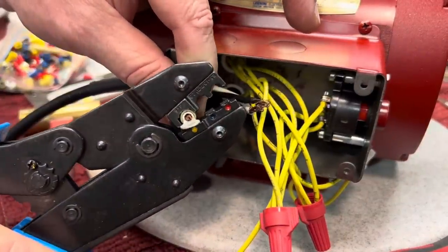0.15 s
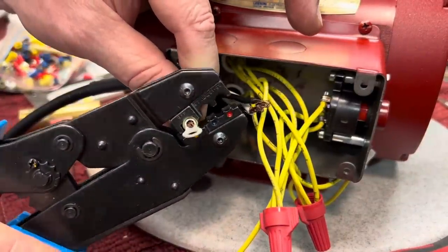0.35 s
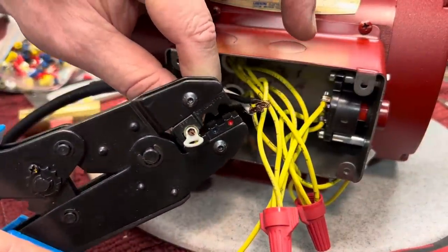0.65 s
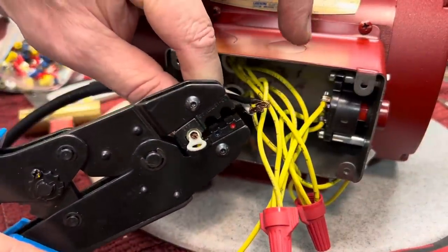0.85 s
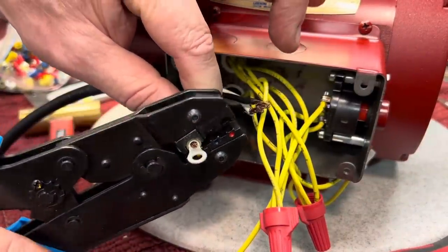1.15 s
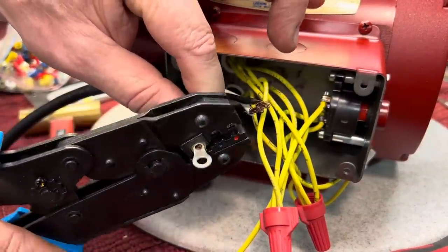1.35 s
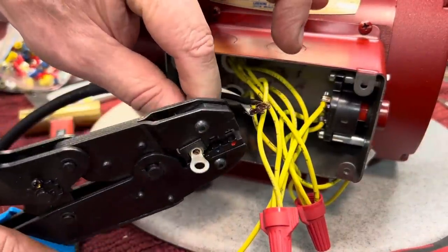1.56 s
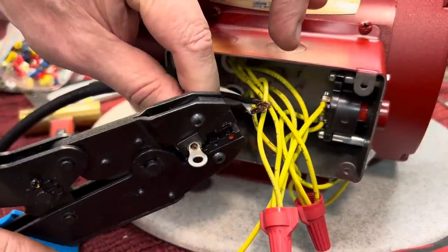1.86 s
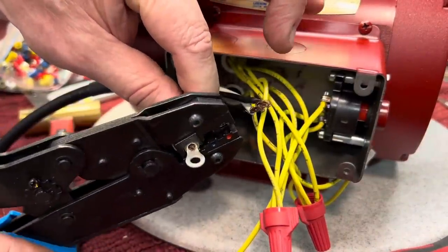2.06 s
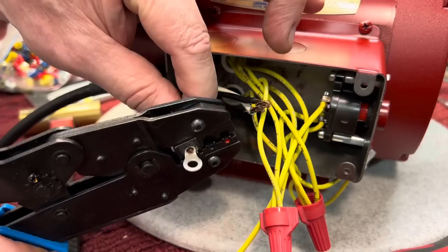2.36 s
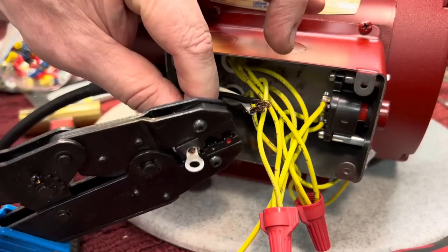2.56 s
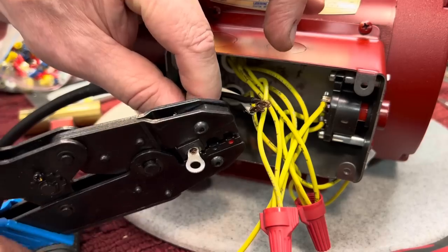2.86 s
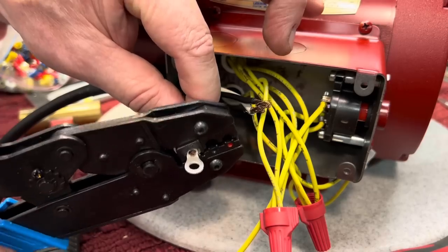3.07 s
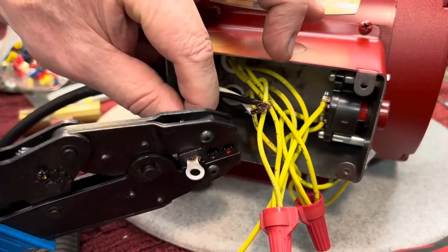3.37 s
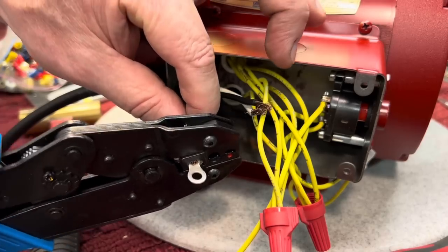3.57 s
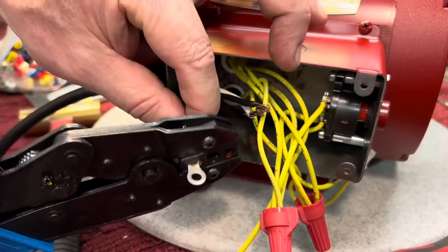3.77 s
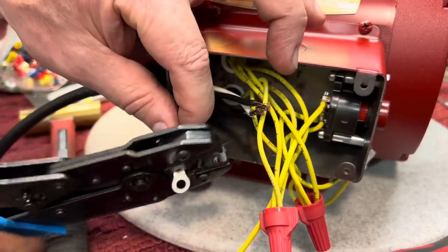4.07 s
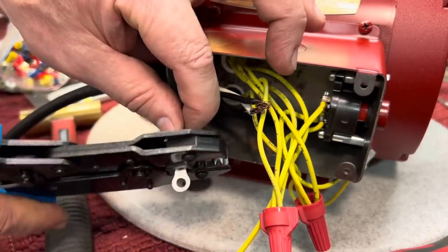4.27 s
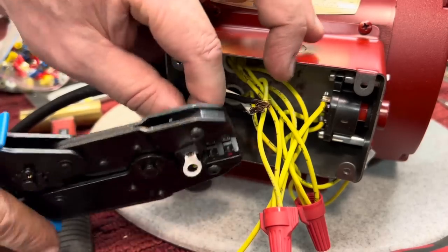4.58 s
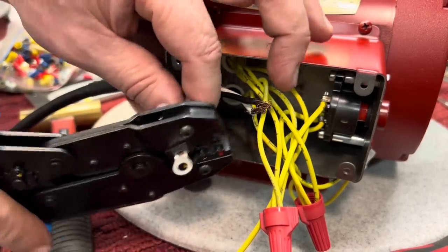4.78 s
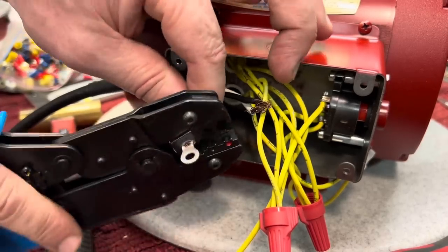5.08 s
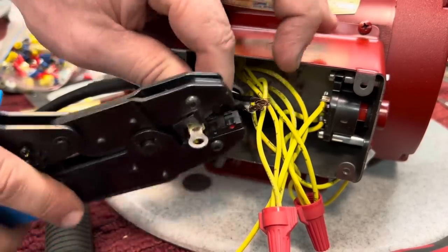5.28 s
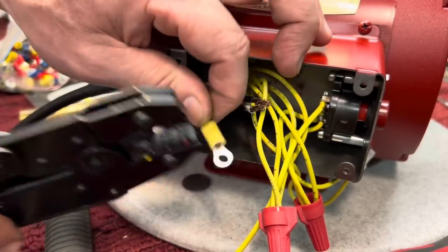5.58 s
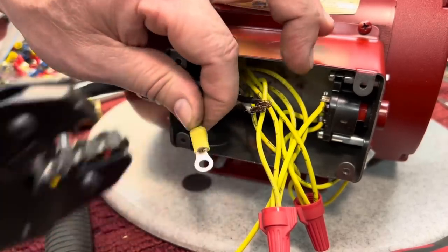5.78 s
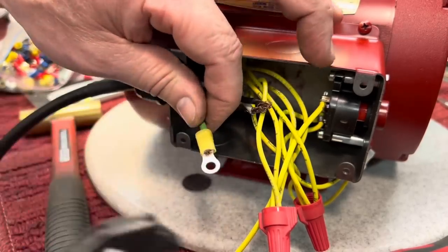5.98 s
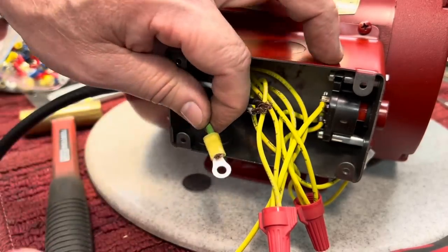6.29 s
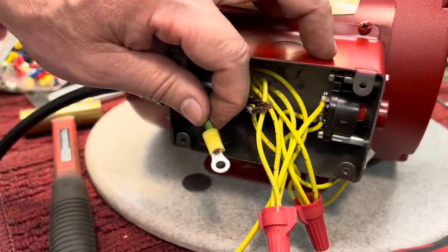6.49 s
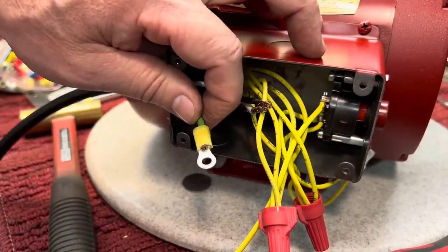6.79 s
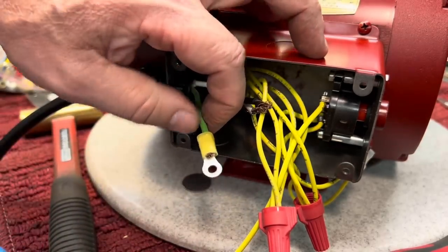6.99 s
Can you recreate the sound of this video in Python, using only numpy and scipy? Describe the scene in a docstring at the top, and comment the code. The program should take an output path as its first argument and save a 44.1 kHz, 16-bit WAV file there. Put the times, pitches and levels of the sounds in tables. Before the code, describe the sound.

Close, crisp metal ratchet clicks speed up to a rapid zipping release, followed by light terminal taps, skin rubs and a tool landing dully.

```python
"""Sharp steel clicks, close by: a ratchet crimper closes on a ring terminal in a small workshop.
The pawl clicks tooth by tooth, then runs over its teeth as the handles spring open; the tool is
pulled off the wire and laid on the carpeted bench. Fingers rub on wire and casing over a faint hum.
Clicks are noise bursts through damped resonances, struck bodies are decaying sines, rubs are grainy
noise; a reverberant room and two microphone ports spread them in stereo."""
import sys
import numpy as np
from scipy import signal
from scipy.fft import rfft, irfft, next_fast_len
from scipy.io import wavfile
from scipy.ndimage import uniform_filter1d

SR = 44100
rng = np.random.default_rng(int(sys.argv[2]) if len(sys.argv) > 2 else 0)


def file_out(sig):
    """Save sig as 16-bit WAV at sys.argv[1]."""
    # one column per channel
    cols = np.atleast_2d(sig).T
    # limit, then scale
    lim = np.clip(cols, -1, 1)
    pcm = np.round(lim * 32767).astype(np.int16)
    wavfile.write(sys.argv[1], SR, pcm)


N = 314874
MID_TO_SIDES = np.array([[1], [-1]])   # puts a side signal on left and, inverted, on right


def from_db(db):
    """Turns decibels into an amplitude factor."""
    return 10 ** (np.asarray(db) / 20)


def rms_one(x):
    """Scales a signal to rms 1."""
    return x / np.sqrt(np.mean(x ** 2) + 1e-20)


def at_hz(points, hz):
    """Reads a table along a log-frequency axis."""
    known_hz, values = np.transpose(points)
    return np.interp(np.log(np.maximum(hz, 1)), np.log(known_hz), values)


def band(x, low_hz, high_hz, order=2):
    """Causal band-pass."""
    sos = signal.butter(order, [low_hz, high_hz], "band", fs=SR, output="sos")
    return signal.sosfilt(sos, x)


def add(track, s, sound):
    """Mixes a short sound into a track at time s."""
    start = round(s * SR)
    track[start:start + len(sound)] += sound[:max(N - start, 0)]


def coloured_noise(spectrum):
    """Noise of a given colour, rms 1."""
    size = next_fast_len(N)
    gain = from_db(at_hz(spectrum, np.fft.rfftfreq(size, 1 / SR)))
    white = rng.standard_normal(size)
    return rms_one(irfft(rfft(white) * gain, size)[:N])


def wander(per_s):
    """Smooth chance that changes about per_s times a second, spread 1."""
    return rms_one(uniform_filter1d(rng.standard_normal(N), max(int(SR / per_s), 1)))


def resonance(x, hz, width_hz):
    """Two-pole resonance with gain 1 on top."""
    r = np.exp(-np.pi * width_hz / SR)
    zeros = np.array([1, 0, -1]) * (1 - r * r) / 2
    poles = [1, -2 * r * np.cos(2 * np.pi * hz / SR), r * r]
    return signal.lfilter(zeros, poles, x)


def ratchet():
    """Pawl and links: a blow that shakes the frame more also has a stronger low knock; ticks are alike."""
    # the pawl drops off a tooth or a link snaps home; frame is 1.7-4.8 kHz, edge 9.5-16.5 kHz:
    # (time [s], level of the 4.8-9.5 kHz ring over 4 ms [dB], frame relative to ring [dB],
    #  edge relative to ring [dB], strongest ring [Hz])
    clicks = [(0.2012, -31.5, -1, -1, 3960), (0.3748, -31.5, 0.5, -2, 4480), (2.093, -24, -2, 4, 11200),
              (2.225, -37, 7.5, 3, 4730), (2.2345, -26, -8.5, -2.5, 8600), (3.0892, -23, -8, -4.5, 5340),
              (3.1696, -19, -8.5, -2.5, 7600), (3.2544, -17.5, -8.5, -7.5, 5230),
              (3.3226, -22, -5.5, -8.5, 3040), (3.4027, -18.5, -6.5, -4, 5040),
              (3.4436, -17.5, 0, -2, 6050), (3.9291, -23.5, -2, 5.5, 7260), (3.9425, -22, -5.5, -1, 7640),
              (3.958, -23.5, -2.5, -1, 8500), (3.9756, -20.5, -4, -0.5, 13200),
              (3.996, -23, -6, -5.5, 6800), (4.025, -17, -7, -6, 6350), (4.044, -17.5, -7.5, -9.5, 6430),
              (4.0699, -19.5, -5, -2, 6630), (4.4011, -26.5, -1.5, 5, 11230), (5.1137, -31.5, 7, 8, 13770),
              (6.4357, -16.5, -10, -6, 7670)]
    # pins and links shift in their holes: (time [s], level [dB])
    ticks = [(0.6766, -61.5), (1.386, -60), (2.3131, -56), (2.353, -55.5), (2.4684, -51), (2.558, -50.5),
             (2.713, -53.5), (2.825, -63.5), (2.9437, -58), (3.162, -53), (3.386, -53.5), (3.6332, -62),
             (3.8685, -41.5), (3.8844, -44), (3.9018, -45.5), (3.9208, -41.5), (4.5255, -58.5),
             (4.8765, -52.5), (4.9922, -59.5), (5.9316, -54), (6.6503, -50)]
    out = np.zeros(N)
    for s, db, frame_db, edge_db, ring_hz in clicks:
        knock_db = -18.5 + 0.64 * frame_db   # relative to the ring
        add(out, s, click(db, knock_db, frame_db, edge_db, ring_hz))
    for s, db in ticks:
        add(out, s, click(db, knock_db=-13, frame_db=-2, edge_db=-3, ring_hz=4860))
    return out


def click(level_db, knock_db, frame_db, edge_db, ring_hz):
    """A millisecond of hard chatter that cracks and rings in the damped steel."""
    # the crimper's hand-damped plates and pawl:
    # (frequency [Hz], width [Hz], level before the bands are balanced [dB])
    steel = [(213, 220, -12), (520.5, 160, -14), (810, 40, -18), (1200, 600, -12), (2252, 170, -17),
             (2894, 280, 4), (3595, 770, 3), (4143, 780, -1.5), (5460, 360, -3.5), (6010, 350, 3.5),
             (6650, 690, 4), (7775, 1100, -2.5), (8625, 150, -1), (11300, 1500, 2.5), (13600, 660, -6.5),
             (16600, 130, -10)]
    # borders between knock, frame, ring and edge: (frequency [Hz])
    edges_hz = [100, 1700, 4800, 9500, 16500]
    rise_s, fall_s, rattle_s = 0.00026, 0.0014, 0.011
    slow_s = 0.0005   # scales the delay of the lower bands
    t, window = np.arange(SR // 20) / SR, SR // 250   # 50 ms of sound, levelled as if over 4 ms

    force = np.minimum(t / rise_s, 1) * np.exp(-np.maximum(t - rise_s, 0) / fall_s)
    force = force + from_db(-17) * np.exp(-t / rattle_s)   # loose links buzz on briefly
    contact = force * rng.standard_normal(len(t))

    ring = from_db(-9) * contact   # the bare crack
    for hz, width_hz, db in steel:
        ring += from_db(db) * resonance(contact, hz, width_hz)
    ring += from_db(5) * resonance(contact, ring_hz, width_hz=750)

    out = np.zeros(len(t))
    # where the blow lands decides how much goes into frame, pawl and tooth edge
    for low, high, db in zip(edges_hz, edges_hz[1:], [knock_db, frame_db, 0, edge_db]):
        part = band(ring, low, high, order=3)
        part_level = np.sqrt(np.sum(part ** 2) / window)
        late = round(slow_s * SR * (np.sqrt(edges_hz[-1] / high) - 1))   # low bending waves travel slower
        out += from_db(level_db + db) * np.roll(part, late) / part_level
    return out


def creak():
    """Tiny slips at uneven moments under load, each ringing somewhere within an octave."""
    # sleeve and links under load: (start [s], end [s], slips per second, middle level [dB])
    creaks = [(.64, .84, 45, -69.5), (0.969, 1.05, 55, -69), (1.308, 1.38, 41.6, -66.5),
              (2.016, 2.085, 55, -68)]
    spread_db, lowest_hz = 6.0, 3000
    out = np.zeros(N)
    for start, end, per_s, db in creaks:
        for k, (moment, size, pitch) in enumerate(rng.random(size=(16, 3))):
            s = start + (k + moment) / per_s
            if s < end:
                slip_db = db + spread_db * (2 * size - 1)
                ring_hz = lowest_hz * 2 ** pitch
                add(out, s, click(slip_db, knock_db=-15, frame_db=1.5, edge_db=-2.0, ring_hz=ring_hz))
    return out


def struck(blows, modes, crack_db, crack_s):
    """Blows on one body: a short crack, and every mode with a strength of its own."""
    out, t = np.zeros(N), np.arange(SR) / SR
    for s, blow_db in blows:
        noise = band(rng.standard_normal(SR), 450, 5000, order=1)
        sound = from_db(crack_db) * np.exp(-t / crack_s) * noise
        for hz, db, t60 in modes:
            strength_db = db + 1.5 * rng.normal()
            sound += from_db(strength_db - 60 * t / t60) * np.sin(2 * np.pi * hz * t)
        add(out, s, from_db(blow_db) * sound)
    return out


def contacts(blows, below_db, knock_db, frame_db, edge_db, ring_hz):
    """The hard click with which each blow on a body begins."""
    out = np.zeros(N)
    for s, db in blows:
        add(out, s, click(db + below_db, knock_db, frame_db, edge_db, ring_hz))
    return out


def return_spring():
    """Hard clicks leave the return spring singing in a few high modes."""
    # (time [s], level [dB])
    plucks = [(3.445, -61), (4.071, -70), (6.437, -63)]
    # (frequency [Hz], average level relative to the pluck [dB], t60 [s])
    spring = [(7241, -1, 1.0), (7806, -4, .33), (13520, -14, .25)]
    return struck(plucks, spring, crack_db=-20.0, crack_s=0.001)


def ring_terminal():
    """The terminal taps the jaws as it comes free: a hard click, then short metal modes."""
    # (time [s], level [dB])
    taps = [(5.3955, -37.5), (5.4198, -39), (5.4882, -52.5), (5.499, -56.5)]
    # (frequency [Hz], average level relative to the tap [dB], t60 [s])
    terminal = [(1065, -13, 0.052), (1130, 2, 0.057), (1230, -15, .037), (2235, -4.5, 0.039),
                (2700, -28, .038), (3360, -18, 0.03), (3390, -0.5, .045), (4630, -28, 0.019),
                (5630, -27, .014)]
    body = struck(taps, terminal, crack_db=-4.5, crack_s=0.009)
    hard = contacts(taps, below_db=-21.0, knock_db=5, frame_db=17.5, edge_db=18.5, ring_hz=12500)
    return body + hard


def bench_landing():
    """The bench takes the tool's weight and booms in low modes, just after the tool's side chatters."""
    # (time [s], level [dB])
    landing = [(6.4701, -34)]
    # (frequency [Hz], average level relative to the landing [dB], t60 [s])
    bench = [(59.96, -4, 0.43), (123.3, -9, 0.2), (205, 4.5, .11), (241, 2, .081), (317, -5.5, 0.18),
             (564, -9.5, 0.06), (940, -5.5, 0.063)]
    return struck(landing, bench, crack_db=-8, crack_s=0.0079) + chatter(landing)


def chatter(landing):
    """The tool's side touches down four times in quick succession, each contact heavier and duller."""
    lead_s, gap_s = 0.0215, 0.0043
    out = np.zeros(N)
    for s, _ in landing:
        for k in range(4):
            ring_db, knock_db = -39.5 - k, 4.5 * k - 7   # the ring weakens while the low knock grows
            contact = click(ring_db, knock_db, frame_db=9.5, edge_db=-4, ring_hz=3500)
            add(out, s - lead_s + gap_s * k, contact)
    return out


def motor_casing():
    """A hand bumps the motor casing: a click and quickly damped modes."""
    # (time [s], level [dB])
    bumps = [(7.0865, -55), (7.0968, -29.5), (7.113, -44), (7.126, -45.5)]
    # (frequency [Hz], average level relative to the bump [dB], t60 [s])
    casing = [(245, -35, 0.17), (451, -9, 0.21), (670, -39, 0.067), (830, 0.5, 0.044), (1160, -1, 0.026),
              (1510, 6, 0.0078), (1840, -3, 0.017), (2440, -7, 0.017), (3100, -26, .015), (5160, -1, 0.013)]
    body = struck(bumps, casing, crack_db=-2, crack_s=0.0025)
    hard = contacts(bumps, below_db=-14.5, knock_db=9.5, frame_db=8.0, edge_db=0, ring_hz=2980)
    return body + hard


def knocks():
    """Cushioned blows: a few dull cycles whose pitch drops at the onset, with a little scuff."""
    # low thuds under some clicks, and soft knocks of tool and hand:
    # (time [s], approximate peak level [dB], settled pitch [Hz], t60 [s])
    soft_knocks = [(1.277, -52.5, 499, 0.025), (2.0942, -38, 300, .011), (3.447, -42, 110, 0.085),
                   (4, -33, 229.3, 0.013), (4.05, -43, 62, 0.2), (4.438, -45.5, 344.4, 0.0097),
                   (4.7437, -29.5, 280, 0.0097), (5.117, -37.5, 222, 0.014), (5.961, -41.5, 299, 0.019),
                   (6.039, -43, 402, 0.018), (6.214, -48, 408, 0.022), (6.456, -27.5, 325, 0.053),
                   (6.4643, -19.5, 262, 0.035), (6.515, -38, 129.7, 0.044)]
    soft_cycles = 0.37   # how many cycles the onset takes
    bend, bend_s = 2.1, 0.001   # starts at 3.1 times the settled pitch
    out, t = np.zeros(N), np.arange(SR // 4) / SR
    for s, db, hz, t60 in soft_knocks:
        cycles = hz * (t + bend * bend_s * (1 - np.exp(-t / bend_s)))
        decay = from_db(-60 * t / t60)
        swell = (1 - np.exp(-cycles / soft_cycles)) ** 2 * decay
        # the scuff fades twice: here and with the swell
        scuff = from_db(-13) * rms_one(band(rng.standard_normal(len(t)), 100, 1300)) * decay
        add(out, s, from_db(db) * (np.sin(2 * np.pi * cycles) + scuff) * swell / swell.max())
    return out


def rubbing():
    """Dry skin slides in tiny slips on wire and grips: a grainy, uneven hiss under each stroke."""
    # every stroke swells and fades alike: (start [s], length [s], level before the final trim [dB])
    rubs = [(.98, 0.38, -66), (1.881, 0.028, -63.5), (4.861, 0.054, -54.5), (5.76, 0.096, -48),
            (5.914, 0.098, -55.5), (6.044, 0.093, -54.5), (6.126, 0.2, -53.5), (6.373, 0.16, -53.5),
            (6.511, 0.2, -56.5), (6.717, 0.12, -57.5), (6.91, 0.24, -61)]
    # (frequency [Hz], relative level per Hz [dB])
    rub_colour = [(400, -34), (1200, -6.5), (3000, -2.5), (5000, 1), (8400, -1.5), (11500, -5), (13200, -3),
                  (16000, -7)]
    peak = 0.46   # share of the stroke at which the pressure peaks
    pressure = np.zeros(N)
    for s, length_s, db in rubs:
        place = np.linspace(0, 1, max(round(length_s * SR), 2))
        swell = np.interp(place, [0, peak, 1], [0, 1, 0])
        add(pressure, s, from_db(db) * np.sin(np.pi / 2 * swell) ** 0.99)
    grain = from_db(2.5 * wander(per_s=250))
    return from_db(-1.5) * pressure * rms_one(coloured_noise(rub_colour) * grain)


def squeaks():
    """Sticking skin sings on the wire's insulation in a narrow, unsteady band."""
    # (start [s], end [s], frequency [Hz], level [dB])
    squeak_list = [(5.704, 5.754, 4140, -68.5), (6.557, 6.673, 4960, -59.5)]
    width_hz = 350   # of each of the two resonances in a row
    out = np.zeros(N)
    for start, end, hz, db in squeak_list:
        swell = signal.windows.tukey(max(round((end - start) * SR), 2))
        noise = rng.standard_normal(len(swell))
        for _ in range(2):
            noise = resonance(noise, hz, width_hz)
        add(out, start, from_db(db) * swell * rms_one(noise))
    return out


def workshop(x):
    """Dense reflections from bench and walls, dying band by band; widest in the middle range."""
    # (frequency [Hz], level before the overall trim [dB])
    room_colour = [(100, -11), (500, -10.5), (1200, -7.5), (2000, -13.5), (3200, -16), (5500, -10),
                   (8000, -18), (12000, -23), (16000, -18)]
    # (frequency [Hz], t60 [s])
    room_t60 = [(100, .28), (2000, .2), (6000, .19), (11000, .17), (16000, .13)]
    # the room's width: (frequency [Hz], side level relative to mid [dB])
    room_side = [(100, -20.5), (500, 1.5), (1200, 2), (5000, 4.5), (8000, -16.5), (16000, -19.5)]
    level_db, first_s = -3, 0.0018   # overall trim; silence before the first reflections
    t, edges = np.arange(SR // 2) / SR, np.geomspace(60, 17000, 13)
    response = 0
    for low, high in zip(edges, edges[1:]):
        hz = np.sqrt(low * high)
        decay = from_db(-60 * t / at_hz(room_t60, hz)) * np.clip(t / first_s - 1, 0, 1)
        decay = decay / np.sqrt(np.sum(decay ** 2))
        noise = band(rng.standard_normal((2, len(t))), low, high, order=3)
        mid_side = noise * from_db([[0], [at_hz(room_side, hz)]])
        response = response + from_db(level_db + at_hz(room_colour, hz)) * mid_side * decay
    mid, side = signal.fftconvolve(x[None], response, axes=1)[:, :N]
    return mid + side * MID_TO_SIDES


def background():
    """Steady soft room noise, a low rumble of handling that swells and sinks, and mains hum."""
    # (frequency [Hz], relative level per Hz [dB])
    air_colour = [(15, -32.5), (25, -15), (42, -11), (64, -1.5), (130, -9), (300, -18), (600, -18.5),
                  (1000, -16), (1450, -25.5), (1950, -21), (2450, -29), (4800, -28.5), (6500, -31),
                  (9000, -40), (16000, -37)]
    # low rumble of handling: (time [s], level before trim and sway [dB])
    rumble_level = [(0.0, -78), (0.95, -66.5), (1.57, -69.5), (3.34, -64), (3.48, -67.5), (5.27, -76),
                    (6.72, -62.5), (7.14, -77)]
    hum_hz, hum_db = 59.2, -73.5   # hum level is rms
    t = np.arange(N) / SR
    air = coloured_noise(air_colour) + from_db(-12) * coloured_noise(air_colour) * MID_TO_SIDES
    rumble = signal.sosfiltfilt(signal.butter(2, 250, fs=SR, output="sos"), air)
    sway_db = 2.5 * wander(per_s=9)
    swell = from_db(5 + np.interp(t, *np.transpose(rumble_level)) + sway_db)
    hum = from_db(hum_db) * np.sqrt(2) * np.sin(2 * np.pi * hum_hz * t)
    return from_db(-65.5) * (air - rumble) + swell * rumble + hum


def scene():
    """Tool, handling noises and their reflections over the background."""
    hands = knocks() + squeaks() + rubbing()
    bodies = return_spring() + ring_terminal() + motor_casing() + bench_landing()
    near = ratchet() + creak() + bodies + hands
    # the two ports face different parts of the ringing plates: newly drawn clicks widen the image
    width = from_db(-7) * band(ratchet() + hands, 800, 5500) * MID_TO_SIDES
    return near + width + workshop(near) + background()


def record(dry):
    """Left is louder in the middle range and lags in the treble; peaks are rounded, both ends cut."""
    # the two microphone ports: (frequency [Hz], left minus right [dB], left lead [rad])
    ports_table = [(60, .4, 0), (250, 3.5, .1), (1000, 4.5, .7), (3300, 5, 1), (4800, 4.7, .1),
                   (6680, 3.5, 0), (8500, 0, -1.71), (17000, 0, -9.72)]
    size = next_fast_len(N + SR // 10)
    hz = np.fft.rfftfreq(size, 1 / SR)
    port_hz, balance_db, lead = np.transpose(ports_table)
    gain = from_db(np.interp(hz, port_hz, balance_db) * np.array([[.5], [-.5]]))
    gain = gain / np.sqrt(np.mean(gain ** 2, axis=0))   # the balance keeps the summed power
    turn = np.exp(1j * np.interp(hz, port_hz, lead) * np.array([[1], [0]]))
    ports = irfft(rfft(dry, size) * gain * turn, size)[:, :N]
    ports = signal.sosfilt(signal.butter(2, 35, "high", fs=SR, output="sos"), ports)
    ports = ports / (1 + (ports / .85) ** 4) ** .25   # soft limit
    return signal.sosfilt(signal.ellip(8, .3, 80, 15900, fs=SR, output="sos"), ports)


dry = scene()
out = record(dry)
file_out(out)
```